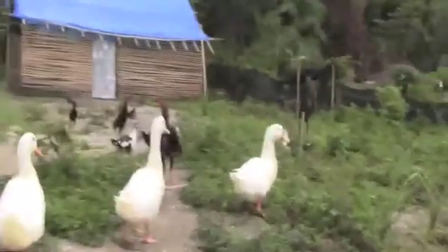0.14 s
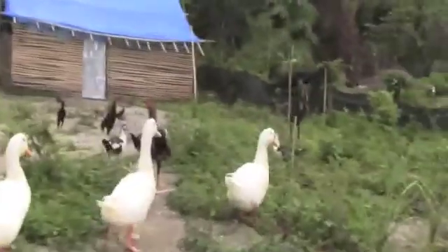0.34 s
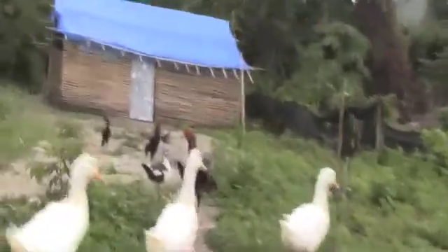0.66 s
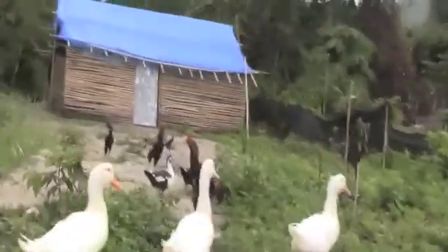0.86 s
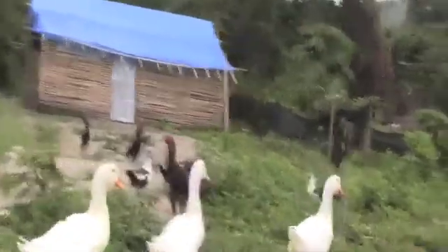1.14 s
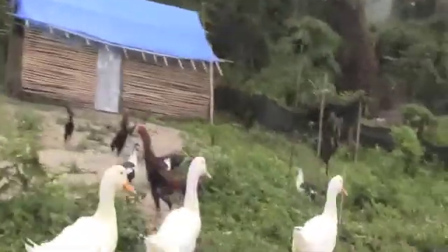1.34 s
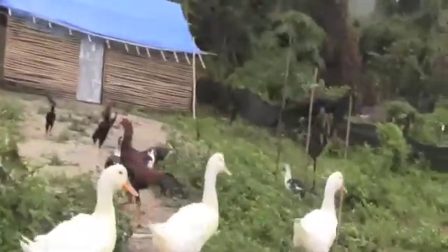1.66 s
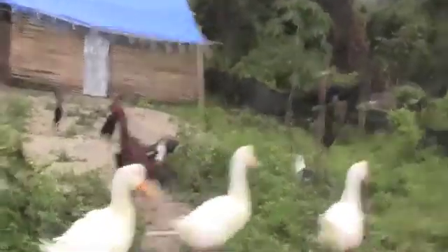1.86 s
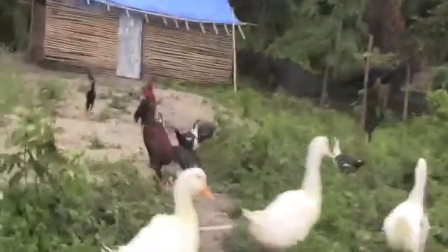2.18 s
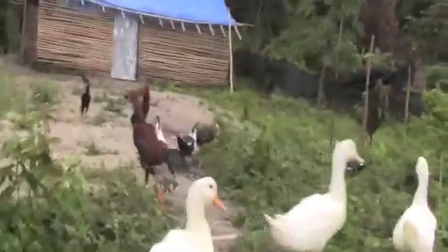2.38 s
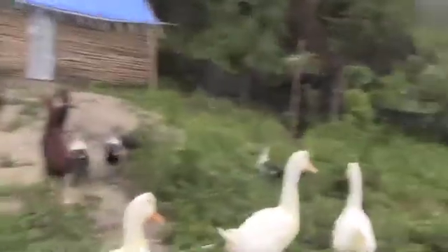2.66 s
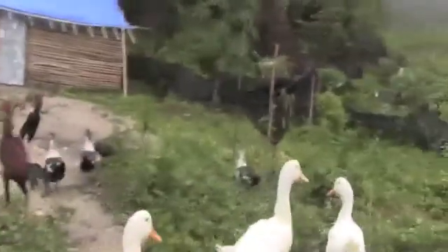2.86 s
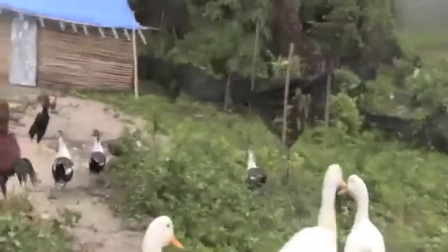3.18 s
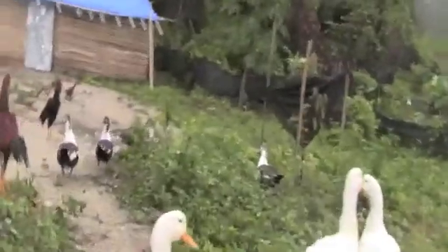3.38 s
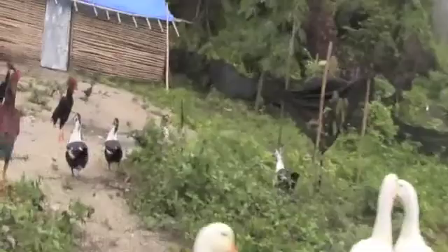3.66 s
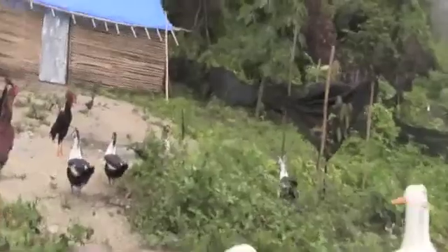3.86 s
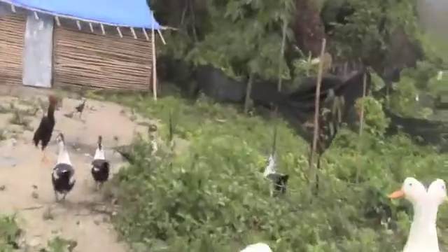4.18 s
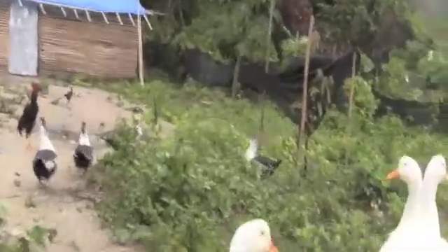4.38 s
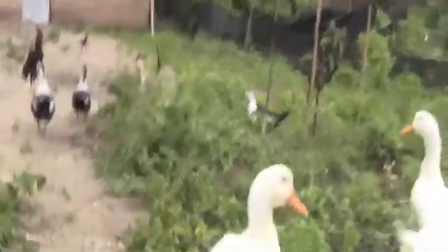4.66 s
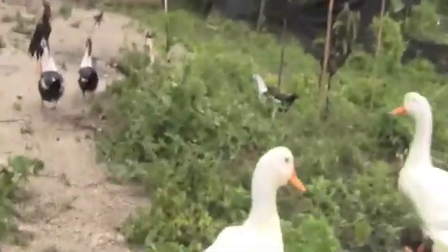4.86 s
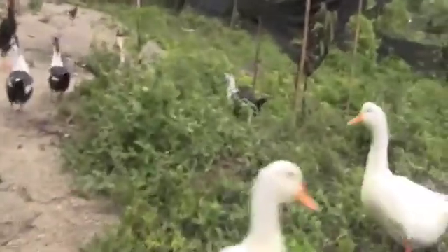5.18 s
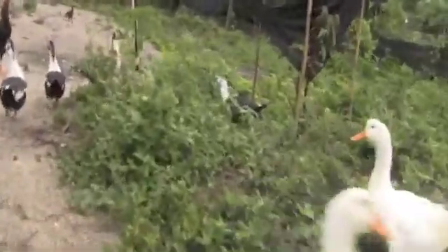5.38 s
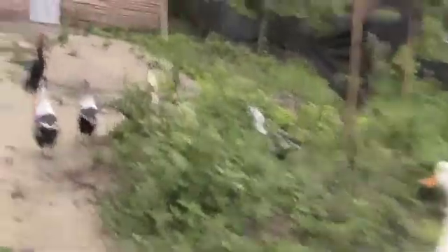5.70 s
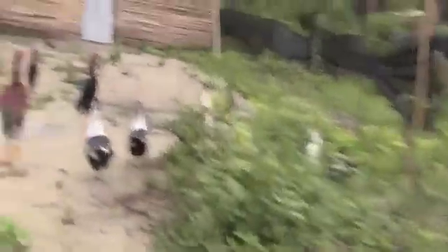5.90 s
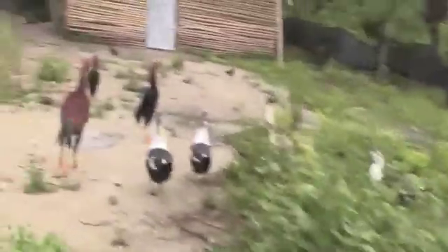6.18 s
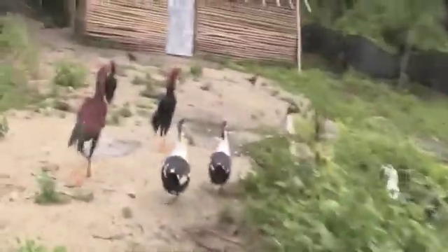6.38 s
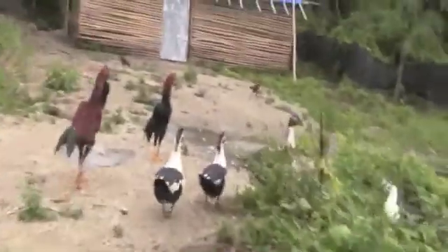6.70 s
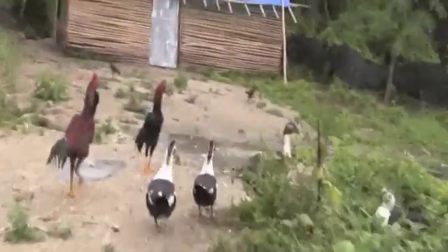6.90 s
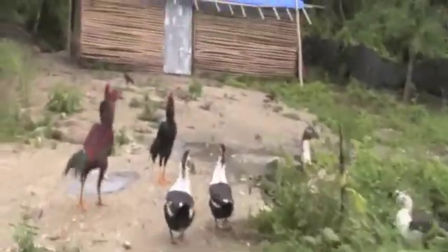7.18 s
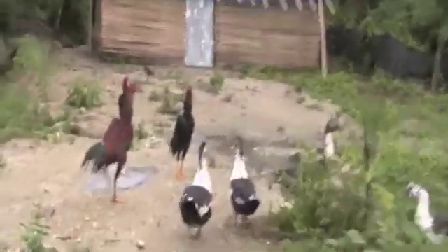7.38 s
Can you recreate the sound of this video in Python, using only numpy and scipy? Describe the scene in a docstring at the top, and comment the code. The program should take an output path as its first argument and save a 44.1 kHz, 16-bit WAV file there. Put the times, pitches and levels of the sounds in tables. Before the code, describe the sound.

Overlapping duck clucks, squeaky yelps and raspy quacks outdoors, over slow crunching steps and a small bird's faint peeps.

```python
"""Steps crunch over grass and grit in a farmyard hush while ducks chatter close by.
A call opens with a cluck, arches through a wheezy syrinx whistle, drops in a yelp and breaks into slow
throat pulses. Others are hoarse quacks through the open bill, low grunts or bare slurred notes.
A small bird peeps; later a faint, drawn-out call wavers far off."""
import sys
import numpy as np
from scipy import signal
from scipy.fft import rfft, irfft, next_fast_len
from scipy.io import wavfile

SR = 44100
rng = np.random.default_rng(int(sys.argv[2]) if len(sys.argv) > 2 else 0)


def digitize_waveform(pressure):
    """Quantize a signal to 16-bit integers and store it at the path in sys.argv[1].

    Rows of a 2-D input are taken as channels; values are limited to [-1, 1].
    """
    field = np.atleast_2d(pressure).T
    bounded = np.clip(field, -1, 1)
    quanta = np.round(bounded * 32767).astype(np.int16)
    wavfile.write(sys.argv[1], SR, quanta)


N = 332778
T = np.arange(N) / SR
SLAP_HZ = 215  # throat pulse rate as a cluck begins

# whole duck calls: (time [s], length to closing cluck [s], whistle top [Hz], closing throat [Hz],
# hoarseness [ratio], opening [dB], whistle [relative dB], yelp [dB], closing [dB])
DUCK_CALLS = [(.143, 0.063, 1760, 1290, 0.7, -23.5, -31, -35, -31.5),
              (0.289, 0.095, 1720, 1320, 0.4, -34, -59, -22, -17),
              (1.177, 0.092, 1717, 1160, 0.8, -29.5, -36, -27, -22),
              (1.628, 0.1, 1647, 600, 1.1, -27, -41, -33, -35),
              (2.163, 0.087, 1594, 1120, 0.8, -23.5, -46, -28, -24),
              (2.336, 0.089, 1950, 1180, 0.53, -29, -37.5, -22.5, -17.5),
              (3.039, 0.09, 1600, 1120, 0.77, -27.5, -40, -27, -23),
              (3.214, 0.09, 1545, 1165, 0.74, -30, -45, -29, -17),
              (3.394, 0.084, 2005, 1204, 0.7, -30.5, -31.5, -23, -13.5),
              (3.735, 0.071, 1386, 1110, 0, -27.5, -41, -27.5, -24.5),
              (3.904, 0.094, 1582, 1170, 0.73, -25.5, -34, -32, -49),
              (4.105, 0.06, 1640, 1105, .7, -24, -58, -51, -13),
              (4.256, 0.09, 2047, 760, .3, -26.5, -37.5, -30, -33.5),
              (4.512, 0.072, 1228, 1110, 0.3, -21, -32, -31, -32.5),
              (4.683, 0.069, 1905, 760, 0.85, -25, -29.5, -30, -35),
              (4.843, 0.095, 1947, 970, 0, -24, -27, -18, -25),
              (5.016, 0.093, 1920, 1030, 0.23, -22.5, -38, -16.5, -16),
              (5.258, 0.068, 1527, 825, 0.8, -22, -33, -26.5, -30.5),
              (5.409, .092, 1973, 1110, 0.38, -23, -30, -21, -15.5),
              (5.591, 0.091, 2008, 1115, 0.25, -25.5, -40, -20.5, -17),
              (5.939, 0.071, 1234, 960, 0.74, -30, -41, -31, -28.5),
              (6.098, 0.092, 1594, 1030, 0.42, -25.5, -32.5, -26, -25.5),
              (6.269, 0.099, 1846, 1030, 0.6, -27.5, -33, -20, -20.5),
              (6.456, 0.072, 1830, 1110, 0.53, -24.5, -34, -23.5, -24),
              (7.024, 0.074, 1113, 754, .14, -28.5, -34, -31, -21),
              (7.255, 0.088, 1902, 740, 0.2, -27, -34, -24, -26),
              (7.422, 0.089, 1917, 880, 0.57, -26, -30, -22, -21.5)]
# yard hush spectrum: (frequency [Hz], gain [dB])
HUSH_SPECTRUM = [(25, -53), (60, -42), (110, -24), (200, -21), (380, -23), (620, -24.5), (1500, -26.5),
                 (2100, -22.5), (3000, -28.5), (6500, -32.5), (11000, -36)]


def undb(db):
    """Decibels to gain."""
    return 10 ** (np.asarray(db) / 20)


def level(x, db):
    """Scale to an rms level."""
    return x * undb(db) / np.sqrt(np.mean(x ** 2) + 1e-18)


def level_over(x, length_s, db):
    """Scale so that the energy, spread over length_s, has this rms level."""
    return x * undb(db) * np.sqrt(length_s * SR / (np.sum(x ** 2) + 1e-18))


def add(track, start_s, x):
    """Mix a sound into a track."""
    i = max(int(start_s * SR), 0)
    track[i:i + len(x)] += x[:max(N - i, 0)]


def band(x, hz, width_hz):
    """Fixed resonance, unity gain at its centre."""
    return signal.lfilter(*signal.iirpeak(hz, hz / width_hz, fs=SR), x)


def ring(x, hz, width_hz):
    """Resonance whose centre follows a curve."""
    turn = np.exp(2j * np.pi * np.cumsum(hz) / SR)
    pole = np.exp(-np.pi * width_hz / SR)
    return np.real(turn * signal.lfilter([1 - pole], [1, -pole], x / turn))


def decay(x, fall_s):
    """Give each impulse an exponential tail."""
    return signal.lfilter([1], [1, -np.exp(-1 / (fall_s * SR))], x)


def colour(x, spectrum):
    """Filter by (frequency [Hz], gain [dB]) points."""
    hz, db = np.transpose(spectrum)
    size = next_fast_len(len(x))
    bins_hz = np.fft.rfftfreq(size, 1 / SR) + 1
    gain = undb(np.interp(np.log(bins_hz), np.log(hz), db))
    return irfft(rfft(x, size) * gain, size)[:len(x)]


def wander(count, rate_hz):
    """Random curve with a spread near 1."""
    knots = rng.standard_normal(2000)
    return np.interp(np.arange(count) * rate_hz / SR, np.arange(len(knots)), knots)


def hiss(count):
    """White noise, up to 0.25 s."""
    return rng.standard_normal(SR // 4)[:count]


def span(length_s):
    """Time axis with room to ring out."""
    return np.arange(int(length_s * SR) + SR // 32) / SR


def gate(t, length_s, rise_s, fall_s):
    """Smooth onset, hold, decay after length_s."""
    return (1 - np.exp(-(t / rise_s) ** 2)) * np.exp(-np.maximum(t - length_s, 0) / fall_s)


def crackle(rate_hz, spread_db, swish):
    """Dense tiny fractures over a smooth swish."""
    size = undb(spread_db * np.minimum(rng.exponential(size=N), 4))
    grains = (rng.random(N) < rate_hz / SR) * size * rng.choice([-1, 1], N)
    return level(grains, 0) + swish * rng.standard_normal(N)


def crunches(rate_hz, fall_s, bed):
    """Envelope of tufts giving way: unequal bursts over a steady bed."""
    bursts = (rng.random(N) < rate_hz / SR) * rng.uniform(.3, 1, N)
    return level(bed + np.sqrt(decay(bursts ** 2, fall_s) + 1e-18), 0)


def grass_steps(roll_s=0.211, fade_db=-7):
    """Each tread and roll onto the toes crushes grass in uneven crunches."""
    # strides: (time [s], tread length [s], tread [relative dB], roll [relative dB])
    strides = [(-.01, 0.14, -34.5, -48.5), (0.581, 0.18, -35, -42), (1.313, 0.11, -32.5, -41),
               (1.933, 0.22, -36, -54), (2.608, 0.12, -36, -39), (3.25, 0.15, -37, -40),
               (3.997, 0.11, -31, -41), (4.657, 0.2, -33.5, -44), (5.452, 0.28, -38, -69),
               (6.066, 0.017, -29, -36), (6.772, 0.19, -36.5, -43.5), (7.442, 0.24, -46, -37)]
    # crushed grass: (frequency [Hz], gain [dB])
    grass_spectrum = [(40, -44), (90, -45), (200, -9), (500, -2.5), (1000, 1), (1800, 1.5), (2600, -5.5),
                      (4800, -9.5), (7200, -18), (10000, -11), (12000, -26.5)]
    weight = np.zeros(N)
    for step_s, tread_s, tread_db, roll_db in strides:
        for start_s, length_s, db in [(step_s, tread_s, tread_db), (step_s + tread_s, roll_s, roll_db)]:
            t = span(2 * length_s)
            load = gate(t, length_s, rise_s=.015, fall_s=.012)
            add(weight, start_s, load * undb(db + fade_db * t / length_s))
    rustle = colour(crackle(rate_hz=1900, spread_db=3.8, swish=.7), grass_spectrum)
    stems = band(rustle, 1700, 1200)
    blades = rustle - stems
    # stems and blades crunch partly on their own, partly together
    grass = sum(part * crunches(rate_hz=130, fall_s=.004, bed=.9) for part in (stems, blades))
    return level(grass * crunches(rate_hz=60, fall_s=.008, bed=.8), 8) * weight


def hush():
    """Restless yard air with tiny rustles."""
    rustle = crackle(rate_hz=380, spread_db=0, swish=1.26)
    swell = undb(1.3 * wander(N, 9) + wander(N, 40))
    return level(colour(rustle, HUSH_SPECTRUM) * swell, -43)


def husky(phase, width_hz):
    """Rushing air in a narrow band that follows a tone."""
    return wander(len(phase), width_hz) * np.sin(phase) + wander(len(phase), width_hz) * np.cos(phase)


def whistle(hz, hoarse, flutter, flutter_hz, overtone_db):
    """Syrinx tone with husky overtones; hoarseness shakes pitch and strength."""
    # noisy overtones: (multiple of pitch [ratio], width [Hz], gain [dB])
    overtones = [(2.0, 344, -3), (2.3, 447, -7), (2.85, 888, -7.5)]
    count = len(hz)
    phase = 2 * np.pi * np.cumsum(hz * (1 + flutter * hoarse * wander(count, flutter_hz))) / SR
    upper = sum(undb(db) * husky(ratio * phase, width_hz) for ratio, width_hz, db in overtones)
    shake = undb(4 * hoarse * wander(count, 614) + 2.5 * wander(count, 175))
    return (np.sin(phase) + undb(overtone_db) * upper) * shake


def wheeze_events(wait_s=0.011, call_share=0.501, lone_hoarse=0.83):
    """All wheezes: (time [s], length [s], three pitches [Hz], hoarseness [ratio], relative level [dB])."""
    # lone wheezes: (time [s], length [s], whistle top [Hz], relative level [dB])
    lone = [(0.035, 0.11, 1593, -36), (0.614, 0.076, 1523, -32.5), (2.536, 0.054, 1936, -41.5),
            (1.219, 0.042, 1690, -32), (1.452, 0.073, 1756, -32), (1.958, 0.063, 1582, -32.5),
            (2.118, 0.082, 1630, -32.5), (2.436, 0.057, 1760, -36.5), (2.691, 0.058, 1552, -31.5),
            (2.8, 0.019, 1470, -27.5), (2.895, 0.053, 1287, -38), (3.262, 0.047, 1411, -28.5),
            (3.358, 0.039, 1614, -34), (3.652, 0.079, 1413, -37), (4.42, 0.098, 1400, -38.5),
            (4.803, 0.044, 1637, -35), (5.817, 0.071, 1550, -37), (6.047, 0.058, 1743, -34.5),
            (6.416, 0.046, 1495, -37.5), (6.648, 0.064, 1617, -34), (7.186, 0.065, 1814, -37)]
    climb, arch = np.array([.78, .97, .91]), np.array([.87, .93, .92])  # start, middle, end
    events = [(start_s + wait_s, call_share * length_s, top_hz * climb, hoarse, db)
              for start_s, length_s, top_hz, _, hoarse, _, db, _, _ in DUCK_CALLS]
    return events + [(start_s, length_s, top_hz * arch, lone_hoarse, db)
                     for start_s, length_s, top_hz, db in lone]


def wheezes(gain_db=4, lead_s=0.0033, breakup=0.21):
    """Whistles arch over, each bent its own way, and break up into air rushing through the bill."""
    # air resonances: (multiple of pitch [ratio], width [Hz], gain [dB])
    air_modes = [(.72, 413.5, 9.5), (1.15, 616, 11), (2.3, 1103, -14)]
    out = np.zeros(N)
    for start_s, length_s, pitches_hz, hoarse, db in wheeze_events():
        t = span(length_s)
        along = np.clip(t / length_s, 0, 1)
        hoarse = np.clip(hoarse, 0, 1)
        husk = np.clip(hoarse + breakup * along ** 2, .2, 1)
        bent_hz = pitches_hz * np.exp(np.array([.04, .01, .03]) * rng.standard_normal(3))
        arch_hz = np.polyval(np.polyfit([0, .5, 1], bent_hz, 2), along)
        hz = arch_hz * (1 + .025 * wander(len(t), 130))
        tone = whistle(hz, .2 + .8 * husk, flutter=.125, flutter_hz=1101, overtone_db=-12)
        phase = 2 * np.pi * np.cumsum(hz) / SR
        air = sum(undb(mode_db) * husky(ratio * phase, width) for ratio, width, mode_db in air_modes)
        envelope = gate(t, length_s, rise_s=0.002, fall_s=0.002 + 0.028 * hoarse)
        swell = 1 + 1.5 * np.sin(np.pi * along ** .8)
        voice = (level(tone, 0) + husk * level(air, -1)) * envelope * swell
        add(out, start_s - lead_s, level_over(voice, length_s, db + gain_db))
    return out


def pulses(t, length_s, hz, jitter, scatter_db, slowing):
    """Uneven syrinx slaps that slow as the pressure runs out."""
    timing, size = rng.standard_normal((2, 64))
    periods_s = np.exp(jitter * timing) / hz * (1 + slowing * np.arange(64) / (hz * length_s))
    times_s = np.cumsum(periods_s) - periods_s[0]
    inside = times_s < length_s
    out = np.zeros(len(t))
    out[(times_s[inside] * SR).astype(int)] = undb(scatter_db * size[inside])
    return out


def cluck_events(ordinary_db, peak_s=0.00299, open_s=.011, open_hz=960):
    """Single, opening and closing clucks; a louder closing cluck lasts longer."""
    # single clucks: (peak time [s], length [s], level [dB], throat resonance [Hz])
    singles = [(.998, 0.014, -28, 1360), (1.305, 0.053, -34, 790), (1.331, 0.0052, -26.5, 900),
               (1.556, 0.014, -31, 650), (1.81, 0.013, -32, 990), (1.835, 0.031, -31.5, 740),
               (2.06, 0.014, -26.5, 1250), (2.527, 0.008, -27.5, 1130), (2.609, 0.038, -31, 1080),
               (2.649, 0.05, -33, 1080), (2.812, 0.068, -25.5, 1230), (2.942, 0.01, -29, 1120),
               (3.498, 0.021, -28, 1140), (4.224, 0.005, -20.5, 1600), (5.805, 0.013, -29, 1080),
               (6.404, 0.015, -25, 1140), (6.535, 0.017, -28, 1200)]
    events = list(singles)
    for start_s, length_s, _, throat_hz, _, open_db, _, _, close_db in DUCK_CALLS:
        close_s = .017 * np.exp(0.028 * (close_db - ordinary_db))
        events.append((start_s + peak_s, open_s, open_db, open_hz))
        events.append((start_s + length_s, close_s, close_db, throat_hz))
    return events


def clucks(ordinary_db=-25, swell_s=.0035, fade=1.6, sag=0.22, air_db=-32, leak_db=-17):
    """A few slowing slaps swell and die away, ringing the throat and thumping the chest."""
    # throat modes: (multiple of throat resonance [ratio], width [Hz], gain [dB])
    throat_modes = [(0.699, 247, -5), (1.03, 356, 3), (1.42, 400, -5), (2.1, 700, -12.5), (3.2, 1460, -18)]
    shut_bill = signal.butter(6, 2100, fs=SR, output="sos")
    out = np.zeros(N)
    lead_s = 1 / SLAP_HZ  # pressure peaks near the second slap
    for peak_s, length_s, db, throat_hz in cluck_events(ordinary_db):
        total_s = length_s + lead_s
        t = span(total_s)
        rise = np.minimum(t - lead_s, 0) / swell_s
        pressure = np.exp(rise - fade * np.maximum(t - lead_s, 0) / length_s)
        slaps = pulses(t, total_s, SLAP_HZ, jitter=0.065, scatter_db=7, slowing=0.398) * pressure
        air = decay(slaps, fall_s=.003) * hiss(len(t)) * undb(air_db)
        detunes = np.exp(0.089 * rng.standard_normal(len(throat_modes)))
        centre_hz = throat_hz * (1 + sag * (.5 - np.minimum(t / total_s, 1)))  # the throat relaxes
        throat = np.zeros(len(t))
        for (ratio, width_hz, mode_db), detune in zip(throat_modes, detunes):
            mode_hz = centre_hz * ratio * detune
            throat += undb(mode_db) * ring(ring(slaps + air, mode_hz, width_hz), mode_hz, width_hz)
        muffled = signal.sosfilt(shut_bill, throat) + undb(leak_db) * throat
        chest = band(band(slaps, 205 * detunes[0] ** 2, 160), 268, 266)
        chest_db = -35.5 + 0.52 * (db - ordinary_db)
        cluck = level_over(muffled, length_s, db) + level_over(chest, length_s, chest_db)
        add(out, peak_s - lead_s, cluck)
    return out


def yelps(yelp_s=.021, drop_s=0.012, landing_hz=761.6, bend=1.349):
    """As a call closes the membrane slackens: its whistle swells, drops huskily and throbs."""
    out, t = np.zeros(N), span(yelp_s)
    swell = gate(t, yelp_s, rise_s=.005, fall_s=.002)
    for start_s, length_s, top_hz, _, hoarse, _, _, db, _ in DUCK_CALLS:
        stretch, detune = np.exp(np.array([.18, .08]) * rng.standard_normal(2))
        fallen = np.minimum(t / (drop_s * stretch), 1)
        end_hz = landing_hz * detune
        hz = end_hz * (top_hz / end_hz) ** (1 - fallen ** bend)
        throb = 1 - fallen ** 2 * np.sin(np.pi * SLAP_HZ * (t - yelp_s)) ** 2
        tone = whistle(hz, .35 + .5 * hoarse, flutter=.14, flutter_hz=1200, overtone_db=-19)
        air = band(band(hiss(len(t)), 1620, 1000), 1620, 1000)
        voice = (level(tone, 0) + level(air, -9)) * swell * throb
        add(out, start_s + length_s - yelp_s, level_over(voice, yelp_s, db))
    return out


def quacks(rasp=0.16, sag=0.18, bass_gain_db=17.5):
    """Rasping pulses ring the sinking resonances of the open bill over a clean voiced bass."""
    # quacks: (time [s], length [s], pitch [Hz], bill resonance [Hz], reed resonance [Hz],
    # bill [dB], reed [dB], bass [relative dB])
    calls = [(0.28, 0.05, 200.4, 1044, 4120, -25, -34, -52.5),
             (0.478, 0.049, 210.1, 1074, 4230, -31, -39.5, -51),
             (0.85, 0.048, 229.8, 944, 4300, -26, -36, -43),
             (1.07, 0.045, 207.4, 1045, 4240, -31, -41.5, -49),
             (1.965, 0.041, 197, 1085, 4160, -26.5, -36, -47.5),
             (2.163, 0.035, 207.7, 1053, 4200, -24, -38, -43.5),
             (2.811, 0.05, 190.7, 1120, 4300, -28.5, -36.5, -54),
             (3.317, 0.053, 183.7, 1030, 3540, -27, -44, -55.5),
             (5.597, 0.045, 171, 1056, 3770, -25, -37.5, -62),
             (6.284, 0.039, 328, 1085, 4000, -26, -40, -54),
             (6.484, 0.056, 202, 1133, 3620, -20.5, -33.5, -46),
             (7.072, 0.058, 188.5, 1013, 3700, -24.5, -37, -52)]
    # open bill: (multiple of bill resonance [ratio], width [Hz], level [dB])
    bill_modes = [(1.0, 69.6, 4), (1.55, 172, 7), (1.85, 190, -1.5), (2.45, 298, -7)]
    # reedy top: (multiple of reed resonance [ratio], width [Hz], level [dB])
    reed_modes = [(.6, 260, -5), (.76, 420, 3.5), (1.05, 327, 5.5), (1.55, 696, -4.5)]
    out = np.zeros(N)
    for start_s, length_s, hz, bill_hz, reed_hz, bill_db, reed_db, bass_db in calls:
        t = span(length_s)
        slaps = pulses(t, length_s, hz, jitter=.011, scatter_db=1.6, slowing=.07)
        air = decay(slaps, fall_s=0.0043) * hiss(len(t))
        drive = band(slaps + rasp * air, 2340, 2700)
        sink = 1 + sag * (.5 - np.minimum(t / length_s, 1))
        envelope = gate(t, length_s, rise_s=0.0024, fall_s=0.031)
        for modes, centre_hz, db in [(bill_modes, bill_hz, bill_db), (reed_modes, reed_hz, reed_db)]:
            voice = np.zeros(len(t))
            for ratio, width_hz, mode_db in modes:
                mode_hz = centre_hz * ratio
                ringing = ring(drive, mode_hz * sink, width_hz)
                voice += level(band(ringing, mode_hz, mode_hz / 2), mode_db)
            add(out, start_s, level_over(voice * envelope, length_s, db))
        body = band(slaps, 555, 720)
        bass = band(body, 267, 57) + band(body, 467, 38.5) + 0.18 * band(body, 1250, 710)
        bass *= gate(t, length_s, rise_s=0.035, fall_s=0.009)
        add(out, start_s, level_over(bass, length_s, bass_db + bass_gain_db))
    return out


def grunts(nose_db=-7):
    """Slow pulses heard through the chest, bill shut, with a faint nasal ring."""
    # grunts: (time [s], length [s], pitch [Hz], level [dB])
    calls = [(.335, .02, 215, -38), (.79, 0.032, 202, -41), (1.3, 0.02, 203, -44),
             (1.63, 0.021, 193, -33.5), (1.99, 0.027, 193, -36), (2.556, 0.014, 207, -40.5),
             (2.632, 0.047, 202, -35.5), (2.825, 0.04, 197, -35), (5.62, 0.024, 180, -33),
             (6.235, .015, 200, -41), (6.9, 0.041, 198.4, -35), (7.105, 0.036, 151.5, -33)]
    out = np.zeros(N)
    for start_s, length_s, hz, db in calls:
        t = span(length_s)
        slaps = pulses(t, length_s, hz, jitter=.04, scatter_db=2, slowing=.15)
        chest = band(band(slaps, 230, 280), 230, 280)
        nose = band(band(slaps, 420, 200), 420, 180)
        voice = (chest + undb(nose_db) * nose) * gate(t, length_s, rise_s=.006, fall_s=.008)
        add(out, start_s, level_over(voice, length_s, db))
    return out


def snaps(fall_s=.0011, top_db=-17, gain_db=-1):
    """Stalks and grit snap underfoot, each with a brief ring."""
    # snaps: (time [s], relative peak [dB], ring [Hz])
    breaks = [(.351, -16, 1190), (.587, -14.5, 2010), (.712, -15, 1300), (1.010, -17, 2500),
              (1.384, -14.5, 1340), (2.001, -10, 1610), (2.763, -18, 1390), (2.911, -22, 3800),
              (3.329, -18, 2000), (3.344, -9.5, 1600), (3.588, -17, 1630), (3.785, -38, 4000),
              (3.861, -22.5, 1940), (4.005, -20, 1500), (4.108, -10, 1320), (4.203, -24, 1300),
              (4.632, -18.5, 1670), (4.678, -10, 1300), (5.179, -13, 1710), (5.516, -12, 2030),
              (5.629, -12, 1480), (6.162, -7.5, 1610), (6.526, -21, 1730), (6.755, -21, 3000),
              (6.844, -11, 1390), (6.898, -14.5, 1760), (6.966, -15, 1400), (6.99, -29, 2190)]
    out, t = np.zeros(N), span(0)
    for start_s, db, hz in breaks:
        burst = hiss(len(t)) * np.exp(-t / fall_s)
        crack = band(band(burst, hz, hz / 2), hz, hz) + undb(top_db) * band(burst, 2300, 3300)
        add(out, start_s, crack / np.abs(crack).max() * undb(db + gain_db))
    return out


def peeps(fall_per_s=5.1):
    """A small bird's thin whistles, all sliding down at the same pace."""
    # peeps: (time [s], length [s], starting pitch [Hz], level [dB])
    notes = [(1.135, 0.051, 2860, -44.5), (1.695, 0.032, 2860, -39), (2.208, 0.038, 3110, -47),
             (2.474, 0.045, 3080, -44.5), (2.868, .035, 3070, -47), (3.057, 0.043, 2880, -48),
             (3.825, .04, 3180, -49), (3.872, .045, 3500, -56), (4.395, 0.063, 3120, -41.5),
             (5.18, 0.054, 3060, -42), (6.609, 0.039, 5270, -49), (7.145, 0.024, 3600, -49),
             (7.178, 0.029, 2980, -40), (7.395, 0.034, 6000, -54)]
    out = np.zeros(N)
    for start_s, length_s, start_hz, db in notes:
        t = span(length_s)
        hz = start_hz * np.exp(-fall_per_s * t)
        tone = whistle(hz, hoarse=.8, flutter=.11, flutter_hz=1500, overtone_db=-28)
        tone *= gate(t, length_s, rise_s=0.006, fall_s=0.005)
        add(out, start_s, level_over(tone, length_s, db))
    return out


def scuffs():
    """A sole scrapes quickly over grit."""
    # scrapes: (time [s], length [s], level [dB])
    scrapes = [(1.869, 0.077, -19), (4.015, 0.083, -26.5), (7.501, 0.056, -23.5)]
    # scraped grit: (frequency [Hz], gain [dB])
    grit_spectrum = [(40, -36), (90, -27), (200, -4), (550, 2), (1800, 1), (3300, -1.5), (5000, -7.5),
                     (7200, -15.5), (10000, -8), (12000, -23)]
    pressure = np.zeros(N)
    for start_s, length_s, db in scrapes:
        add(pressure, start_s, undb(db) * np.sqrt(np.hanning(int(length_s * SR))))
    grit = colour(crackle(rate_hz=2800, spread_db=2, swish=0.38), grit_spectrum)
    return pressure * level(grit, 0)


def slurs():
    """Soft nasal duck notes slide between two pitches and die away."""
    # slurs: (time [s], length [s], starting pitch [Hz], final pitch [Hz], level [dB])
    notes = [(2.526, 0.012, 1235, 916, -31), (3.495, 0.014, 814, 580, -30), (3.756, 0.03, 1185, 1485, -33),
             (4.276, .018, 1850, 2100, -28.5), (4.344, 0.0092, 694, 650, -25.5),
             (5.026, 0.0138, 1676, 1990, -24.5), (5.12, 0.015, 710, 580, -31),
             (5.705, 0.0094, 700, 634, -22), (6.281, 0.027, 950, 1260, -22.5), (7.068, .05, 1092, 597, -29),
             (7.143, 0.019, 1874, 1464, -27), (7.267, 0.0219, 1510, 1884, -33),
             (7.431, 0.031, 830, 684, -35)]
    out = np.zeros(N)
    for start_s, length_s, start_hz, end_hz, db in notes:
        t = span(length_s)
        hz = np.interp(t, [0, length_s], [start_hz, end_hz])
        tone = whistle(hz, hoarse=0.2, flutter=0.081, flutter_hz=900, overtone_db=-17)
        tone *= gate(t, length_s, rise_s=0.0032, fall_s=0.0037)
        add(out, start_s, level_over(tone, length_s, db))
    return out


def far_call():
    """One faint, long tone wavering in pitch and level."""
    # call contour: (time [s], pitch [Hz], level [dB])
    contour = [(4.95, 565, -52), (5.0, 573, -43), (5.2, 555, -51), (5.75, 552, -42), (5.95, 499, -55),
               (6.351, 473, -47), (6.601, 603, -48), (6.8, 524, -51), (6.948, 513, -47)]
    times_s, hz, db = np.transpose(contour)
    pitch_hz = np.interp(T, times_s, hz) * (1 + .012 * wander(N, 40) + .045 * wander(N, 450))
    level_db = np.interp(T, times_s, db, left=-120, right=-120) + 4.5 * wander(N, 45)
    return np.sin(2 * np.pi * np.cumsum(pitch_hz) / SR) * undb(level_db)


def reflections(x, t60_s, db):
    """Thin diffuse echoes off ground, hut and trees."""
    t = np.arange(SR // 2) / SR
    response = rng.standard_normal(len(t)) * undb(-60 * t / t60_s)
    response *= undb(db) / np.sqrt(np.sum(response ** 2))
    return signal.fftconvolve(x, response)[:N]


def scene():
    """Ducks, bird and walker nearly straight ahead; reflections add a little width."""
    # stereo width: (frequency [Hz], side gain [dB])
    width_spectrum = [(30, 0), (150, -22), (330, -1), (700, -10), (2000, -20.5), (5000, -45), (7500, -11),
                      (10500, -1)]
    # slight drift to the right: (time [s], left gain [dB])
    drift = [(0, -.3), (5.0, -.5), (6.2, -1.3), (7.5, -1.4)]
    ducks = clucks() + grunts() + yelps() + slurs() + wheezes() + quacks()
    near = ducks + peeps() + grass_steps() + snaps() + scuffs()
    mid = near + reflections(near, t60_s=0.28, db=-13.5) + far_call() + hush()
    quadrature = signal.hilbert(mid, next_fast_len(N)).imag[:N]
    side = colour(0.42 * quadrature + reflections(mid, t60_s=.04, db=-9), width_spectrum)
    # late echoes and part of the hush arrive from all round
    side += reflections(mid, t60_s=1.0, db=-27.5)
    side += level(colour(rng.standard_normal(N), HUSH_SPECTRUM), -59)
    left_gain = undb(np.interp(T, *np.transpose(drift)))
    return np.array([(mid + side) * left_gain, mid - side])


def record(dry):
    """Round the highest peaks and cut the top."""
    ceiling, top_hz = .95, 11300
    rounded = dry / (1 + (dry / ceiling) ** 4) ** .25
    return signal.sosfilt(signal.ellip(10, .2, 80, top_hz, fs=SR, output="sos"), rounded)


dry = scene()
out = record(dry)
digitize_waveform(out)
```